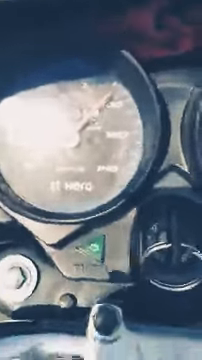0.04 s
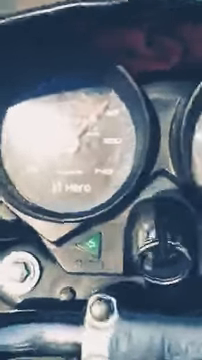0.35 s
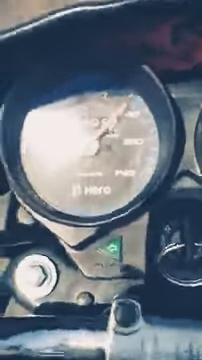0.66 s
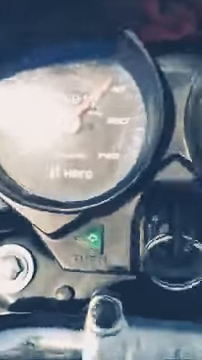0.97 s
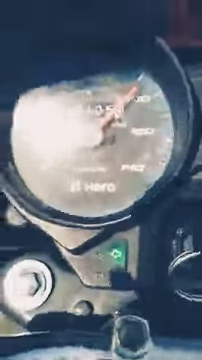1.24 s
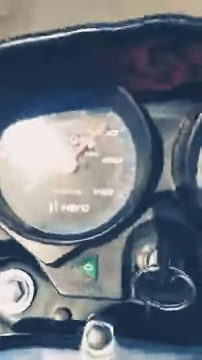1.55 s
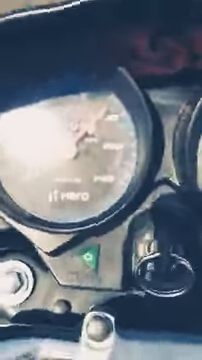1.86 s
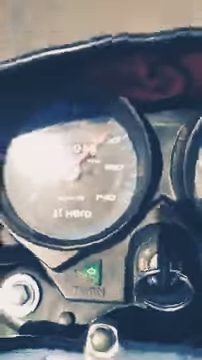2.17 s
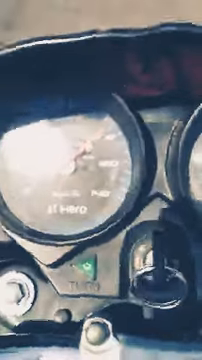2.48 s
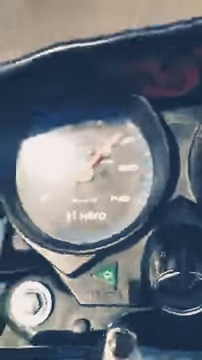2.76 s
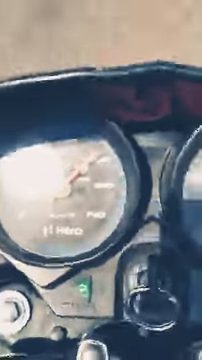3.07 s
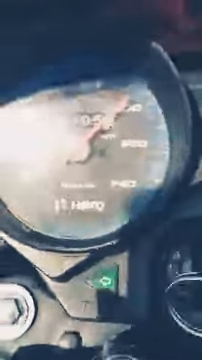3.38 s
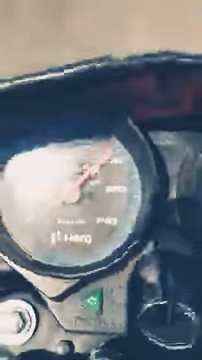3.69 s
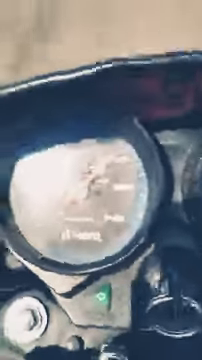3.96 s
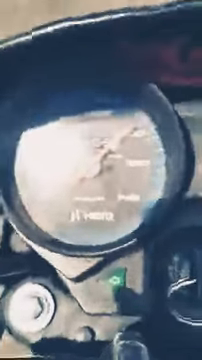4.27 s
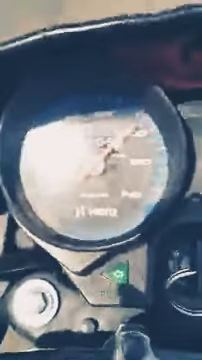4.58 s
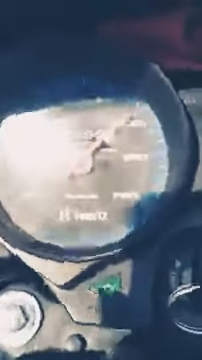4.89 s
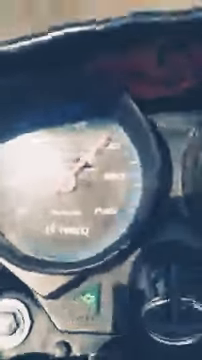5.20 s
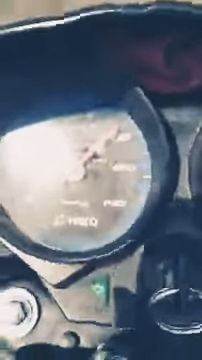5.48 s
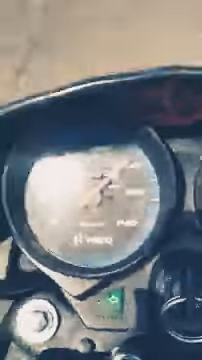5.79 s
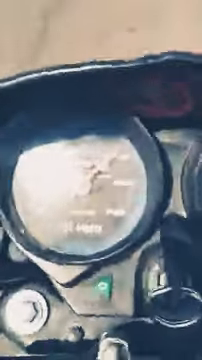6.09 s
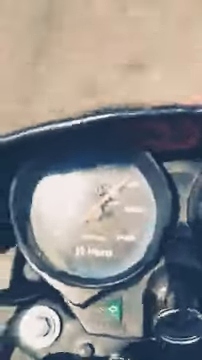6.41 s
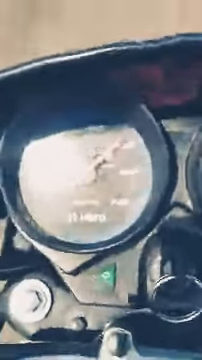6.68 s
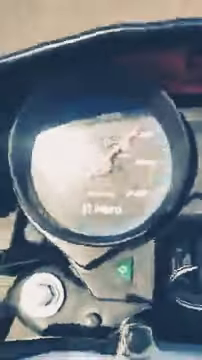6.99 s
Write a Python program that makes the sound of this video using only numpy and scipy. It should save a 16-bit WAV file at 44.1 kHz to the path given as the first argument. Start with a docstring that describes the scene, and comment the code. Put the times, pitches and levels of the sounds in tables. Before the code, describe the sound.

A motorcycle cruises on a paved road, heard from a phone held behind its windscreen. Wind rumbles, rasps and crackles on the microphone throughout, over a steady one-cylinder drone and a smooth rush of tyres and air. Sharp gusts hit at the start, and pushes of air briefly overload the microphone. The engine's low note swells midway, sinks and returns. Near the end, longer gusts arrive and the wind roars louder.

```python
"""A motorcycle cruises along a paved road, heard from a phone held behind its windscreen.
From the start, wind rasps and crackles over a steady one-cylinder drone and a rush of tyres and air.
Sharp gusts hit before 0.5 s. Slow pushes of air overload the microphone, hardest at 2.5 s.
The engine's low note is loudest near 3.4 s, sinks at 4.5 s and comes back.
From about 6 s, longer gusts and more pushes arrive, and the wind's roar swells."""
import sys
import numpy as np
from scipy.fft import rfft, irfft, next_fast_len
from scipy.io import wavfile
from scipy.ndimage import map_coordinates

SR = 44100
rng = np.random.default_rng(int(sys.argv[2]) if len(sys.argv) > 2 else 0)


def int16_out(signal):
    """Quantize to a 16-bit WAV file."""
    q = np.round(np.clip(np.atleast_2d(signal).T, -1, 1) * 32767)
    wavfile.write(sys.argv[1], SR, q.astype(np.int16))


N = 319725

# how hard the air blows at the microphone: time_s, strength_db
AIRFLOW = [(0, -13.5), (.09, -19), (.2, -14.5), (.28, -15.5), (.42, -15.5), (.58, -16), (.85, -17),
           (.99, -14.5), (1.17, -23.5), (1.3, -18), (1.47, -15), (1.58, -17), (1.7, -16), (1.9, -15.5),
           (2.27, -15.5), (2.48, -12.5), (2.6, -15.5), (2.97, -16.5), (3.09, -14.5), (3.36, -17),
           (3.62, -16.5), (3.95, -15.5), (4.06, -15.5), (4.19, -16.5), (4.5, -16), (4.72, -17),
           (4.95, -15.5), (5.12, -15), (5.5, -15.5), (5.8, -16.5), (6.03, -14.5), (6.25, -16), (6.5, -12.5),
           (6.65, -12.5), (6.85, -14.5), (7.02, -17.5), (7.25, -15)]
def airflow():
    """How far the wind is above or below its average strength, in dB."""
    strength_db, = curves(AIRFLOW)
    return strength_db - strength_db.mean()


# the tone of big, medium and tiny eddies (little whirls of air): pitch_hz, level_db
BIG_EDDY_TONE = [(20, -16.5), (80, -8), (145, 0.5), (210, -2.5), (300, -5), (700, -15.5), (2000, -26.5),
                 (8000, -74)]
MEDIUM_EDDY_TONE = [(30, -6.5), (150, 3), (350, 2.5), (620, -2), (820, 0), (1100, -4.5), (1600, -5.5),
                    (3000, -16.5), (8000, -41.5)]
TINY_EDDY_TONE = [(200, -17), (800, -17), (2000, 1), (4000, -5), (6000, -7), (8000, -6.5)]
# swells in the roar of the big eddies: middle_s, length_s, added_db
ROAR_SWELLS = [(0.307, 0.4, 3), (0.631, 0.0077, 4), (0.844, 0.084, 1), (1.105, 0.0082, 16),
               (1.222, 0.01, 5.5), (1.31, .06, 3.5), (1.76, 0.21, 4.5), (2.323, 0.04, 2.5),
               (2.476, 0.11, 6), (3.525, 0.23, 2.5), (6.297, .26, 1), (6.543, .2, 4), (6.676, .05, 8.5),
               (6.83, .096, -0.5), (7.22, 0.09, 2)]
def wind(big_db=-18, medium_db=-17.5, tiny_db=-33, spit_db=5.5):
    """Three sizes of eddy ride on one airflow; the smaller they are, the more they come in bursts."""
    flow_db = airflow()
    surge_db = wobble(22)
    bursts = unit(0.21 * surge_db + wobble(70) + wobble(220))
    roar_db = sum(db * swell(s, length) for s, length, db in ROAR_SWELLS)
    big = amp(big_db + 0.4 * flow_db + roar_db + surge_db) * noise(BIG_EDDY_TONE)
    medium = amp(medium_db + 1.36 * flow_db + 2.5 * bursts) * noise(MEDIUM_EDDY_TONE)
    drift_db = 0.94 * flow_db + 0.7 * wobble(5)
    crackle_db = 3 * bursts + spit_db * wobble(800)  # each spit lasts about a millisecond
    tiny = amp(tiny_db + drift_db + crackle_db) * noise(TINY_EDDY_TONE)
    return big + medium + tiny


# big, slow pushes of air: middle_s, length_s, pressure (1 is full scale; below 0 is suction)
AIR_PUSHES = [(0.524, 0.015, -.3), (0.609, 0.022, -0.27), (1.121, 0.013, .28), (1.212, 0.0028, -.45),
              (1.792, 0.0082, -0.58), (2.51, 0.0055, -1), (2.53, 0.0059, -0.38), (2.722, 0.0077, -0.5),
              (3.002, .008, 0.47), (3.781, 0.011, -0.31), (3.913, .009, -0.62), (4.394, 0.0085, .45),
              (5.112, 0.01, -0.36), (6.206, .007, -.38), (6.721, 0.0084, -.45), (6.735, 0.011, -.75),
              (7.125, 0.01, -0.44)]
def pushes(roughness=0.2):
    """The very largest eddies press or suck on the microphone, roughened by smaller ones inside."""
    smooth = sum(pressure * swell(s, length) for s, length, pressure in AIR_PUSHES)
    return smooth * (1 + roughness * noise(MEDIUM_EDDY_TONE))


def shelter(dip_db=-6):
    """While one push covers the microphone hole, it holds off the rest of the wind."""
    return amp(dip_db * sum(swell(s, length) for s, length, _ in AIR_PUSHES))


# gusts that hit the microphone hole head-on: middle_s, length_s, level_db
GUST_HITS = [(0.2, 0.028, -25.5), (0.337, 0.028, -13), (0.388, 0.016, -8.5), (0.44, 0.027, -1),
             (0.652, 0.0089, -21.5), (0.696, 0.006, -20), (0.842, .02, -26), (1.644, 0.013, -22),
             (1.812, .012, -20.5), (1.841, .01, -12.5), (2.024, .009, -20), (2.081, 0.0085, -19),
             (2.309, .011, -11), (2.341, 0.011, -11), (2.399, 0.031, -15), (2.481, 0.058, -17),
             (2.542, 0.015, -17.5), (2.666, 0.016, -14), (2.943, .011, -18.5), (3.039, 0.013, -13),
             (3.082, .014, -11), (3.225, .13, -31), (3.712, 0.013, -22.5), (3.797, 0.0087, -16.5),
             (3.874, 0.0081, -16.5), (3.898, 0.015, -18.5), (4.059, 0.014, -8), (4.121, 0.025, -20),
             (4.426, .011, -16.5), (4.514, .009, -11.5), (4.586, 0.0083, -11.5), (4.861, .05, -29.5),
             (5.181, 0.021, -29), (5.294, .04, -20.5), (5.42, 0.0078, -5), (5.547, .014, -17.5),
             (5.603, 0.0095, -20.5), (5.935, 0.018, -14), (5.986, .075, -17.5), (6.093, 0.17, -21.5),
             (6.224, .02, -26), (6.414, 0.024, -13), (6.447, .01, -12.5), (6.513, .1, -21),
             (6.668, 0.17, -29), (6.752, 0.013, -19.5), (6.888, 0.18, -33.5)]
# the tone of the larger eddies inside a gust: pitch_hz, level_db
SWIRL_TONE = [(30, -5), (150, 8.5), (400, 0.5), (900, -0.5), (2000, -7), (3200, -17), (8000, -44.5)]
def gusts(swirl_db=5, tiny_db=1.4, spit_db=8, flutter_db=3.5, fringe_s=0.064, fringe_db=-25.5):
    """Fluttering gusts tear across the microphone: tiny eddies spit on top of a rasping swirl."""
    strength = np.zeros(N)
    for s, length, db in GUST_HITS:
        fringe = amp(fringe_db) * swell(s, length + fringe_s)  # weaker air before and after
        strength += amp(db) * (swell(s, length) + fringe)
    flutter = unit(amp(flutter_db * wobble(170)))
    spitting = amp(tiny_db + spit_db * wobble(700)) * noise(TINY_EDDY_TONE)
    swirl = amp(swirl_db) * noise(SWIRL_TONE)
    return strength * flutter * (spitting + swirl)


# deep swells of the rumble: middle_s, length_s, added_db
RUMBLE_SWELLS = [(0.592, .13, 4.5), (1.23, 0.056, 2.5), (1.366, 0.19, 4), (1.834, 0.071, 3.5),
                 (2.56, 0.17, 2.5), (2.755, 0.044, -1), (3.096, 0.31, 1), (3.422, 0.23, 3),
                 (3.663, 0.28, 2), (3.9, 0.18, 1.5), (4.138, .07, 0.5), (4.558, 0.24, 1), (5.083, .14, 5),
                 (5.393, 0.12, 1.5), (5.573, .05, 3.5), (6.196, 0.063, 6.5), (6.734, 0.27, 5)]
# the tone of the rumble, and of the hollow thump inside a swell: pitch_hz, level_db
RUMBLE_TONE = [(5, -1.5), (25, 0), (60, 2), (125, -3.5), (200, -13.5), (500, -34), (2000, -60), (8000, -83)]
THUMP_TONE = [(30, -22.5), (60, -2), (110, 1), (160, -3.5), (260, -16.5), (600, -37), (8000, -100)]
def rumble(level_db=-15, wobble_db=2, thump_db=-16.5):
    """Churned air behind the windscreen swings across the microphone and thumps as it swells."""
    boost = amp(sum(db * swell(s, length) for s, length, db in RUMBLE_SWELLS))
    sway = amp(level_db + wobble_db * wobble(22)) * boost * noise(RUMBLE_TONE)
    thump = amp(thump_db) * (boost - 1) * noise(THUMP_TONE)
    return sway + thump


# the tone of the high sizzle: pitch_hz, level_db
SIZZLE_TONE = [(500, -17.5), (2500, -4), (4500, -4.5), (7000, -0.5), (9000, -6), (12000, -39.5)]
def sizzle(level_db=-33.5, spurt_db=5, spike_db=6):
    """Tiny eddies break on the rim of the microphone hole, crackling louder as the airflow grows."""
    spurts = amp(spurt_db * np.minimum(wobble(210), 1))
    spikes = amp(spike_db * wobble(1000))
    return amp(level_db + airflow()) * unit(spurts * spikes * noise(SIZZLE_TONE))


# the nearly steady engine speed: time_s, firings_per_s
ENGINE_SPEED = [(0, 71.5), (1.2, 71.85), (3.2, 72.15), (6.3, 71.95), (7.25, 71.7)]
# the engine's low note, then its overtones (higher notes): firing_multiple, relative_db
EXHAUST_NOTES = [(1, 4), (2, 2), (3, -2), (4, -1), (5, -12.5), (7, -10.5), (8, -9)]
# how loud the engine is at the handlebar: time_s, low_note_db, overtones_db
ENGINE_LEVELS = [(0, -31, -21), (1.2, -24, -30), (1.7, -28.5, -37), (2.4, -25.5, -20), (3.4, -20, -21.5),
                 (4.5, -33.5, -30.5), (5.5, -29, -25.5), (6.3, -25.5, -23), (7.25, -26, -21.5)]
def engine(waver_db=2, smear_rad=0.25):
    """The cylinder's firings make a low note and overtones, each wavering as the air carries it."""
    firing_hz, = curves(ENGINE_SPEED)
    low_note_db, overtones_db = curves(ENGINE_LEVELS)
    phase = 2 * np.pi * np.cumsum(firing_hz) / SR
    notes = []
    for multiple, db in EXHAUST_NOTES:
        loudness = amp(db + waver_db * wobble(9))
        smeared = round(multiple) * (phase + smear_rad * wobble(9))  # higher notes smear more
        notes.append(loudness * np.sin(smeared + rng.uniform(0, 2 * np.pi)))
    low_note, *overtones = notes
    return amp(low_note_db) * unit(low_note) + amp(overtones_db) * unit(sum(overtones))


# the tone of the tyres and passing air: pitch_hz, level_db
ROAD_TONE = [(100, -9.5), (800, -11), (2000, -1), (4000, -7.5), (6000, -18.5), (7500, -7.5), (9000, -24)]
def road(level_db=-29.5):
    """Rolling tyres and air slipping round the bodywork make a smooth, even rush."""
    return amp(level_db) * noise(ROAD_TONE)


def amp(db):
    """Turn decibels into a number to multiply a sound by."""
    return 10 ** (np.asarray(db) / 20)


def unit(x):
    """Scale a signal so that its average size (rms) is 1."""
    return x / np.sqrt(np.mean(x ** 2) + 1e-20)


def tone_gain(tone, hz):
    """How strong a tone table makes each pitch, joining its points on a log pitch scale."""
    pitch_hz, level_db = np.transpose(tone)
    return amp(np.interp(np.log(hz + 1), np.log(pitch_hz + 1), level_db))


def curves(rows):
    """Join the dots of a table over time: one curve for each column after the first."""
    time_s, *columns = np.transpose(rows)
    return [np.interp(np.arange(N) / SR, time_s, column) for column in columns]


def wobble(points_per_s):
    """A smooth curve through random points."""
    position = np.arange(N) * points_per_s / SR
    return map_coordinates(rng.standard_normal(N // 20), [position], mode="wrap")


def swell(middle_s, length_s):
    """A flat-topped bump of height 1 with smooth edges."""
    distance = np.clip(2 * (np.arange(N) / SR - middle_s) / length_s, -2, 2)
    return np.exp(-np.square(distance * distance))


def noise(tone):
    """Noise with the given tone and an average size of 1."""
    size = next_fast_len(N + SR // 2)
    gain = tone_gain(tone, np.fft.rfftfreq(size, 1 / SR))
    return unit(irfft(rfft(rng.standard_normal(size)) * gain, size)[:N])


def scene():
    """All the sounds add up as air pressure at one microphone."""
    rough_air = shelter() * (rumble() + wind() + sizzle() + gusts())
    return (rough_air + pushes() + engine() + road())[None]


# how the phone boosts or cuts each pitch: pitch_hz, gain_db
PHONE_TONE = [(60, 0), (200, 1.3), (400, 3.8), (700, 4.1), (1000, 1.2), (1500, -5.9), (2200, -12),
              (3000, -17.8), (4000, -7.6), (5500, -.9), (6300, 2.9), (7400, 7.6), (7750, 5.6), (7930, 0.4),
              (8300, -11), (8600, -36), (9000, -50)]
def phone_filter(x, top_hz=9168):
    """The phone colours the sound and drops all above top_hz; sudden jumps overshoot and settle."""
    size = 2 * next_fast_len(N)
    hz = np.fft.rfftfreq(size, 1 / SR)
    # fold the filter in time, so that its tone rings after a jump and not before (minimum phase)
    folded = irfft(np.log(tone_gain(PHONE_TONE, hz)), size)
    folded[1:size // 2] *= 2
    folded[size // 2 + 1:] = 0
    response = np.exp(rfft(folded)) * (hz < top_hz)
    return irfft(rfft(x, size) * response, size)[:N]


def record(dry, limit_db=-12, hardness=8, give=0.075, knee=0.45):
    """Big pushes pin the microphone at its limit, squashing finer sounds; the phone then filters it."""
    pressure = dry[0]
    pinned = pressure / (1 + np.abs(pressure / amp(limit_db)) ** hardness) ** (1 / hardness)
    yielding = knee * np.arcsinh(pressure / knee)  # past its limit it still gives a little
    return phone_filter((1 - give) * pinned + give * yielding)[None]


dry = scene()
out = record(dry)
int16_out(out)
```